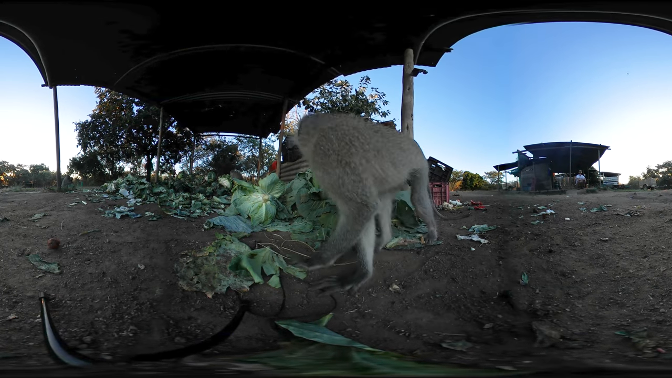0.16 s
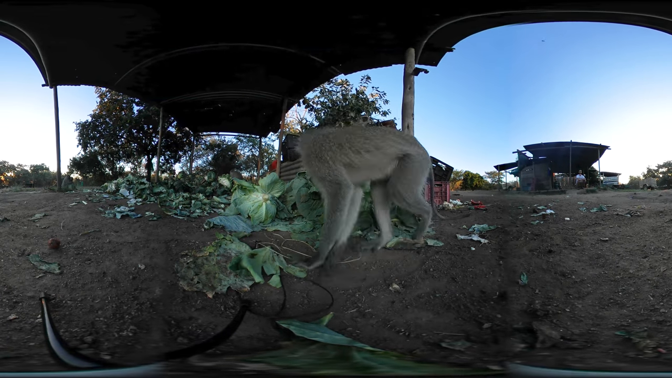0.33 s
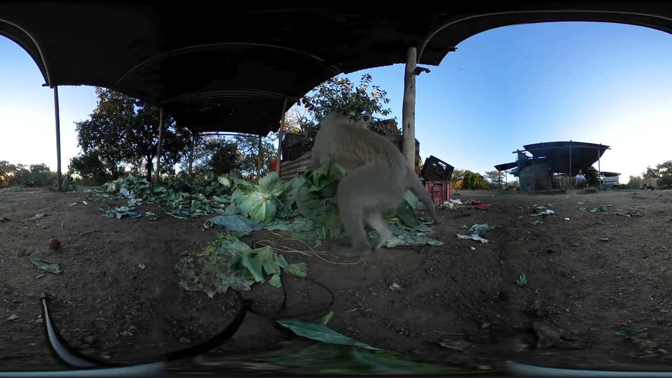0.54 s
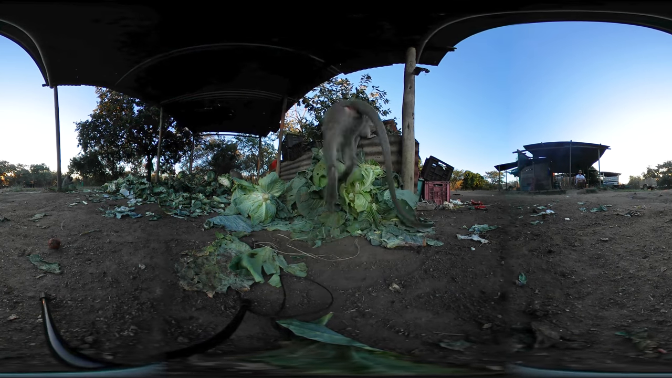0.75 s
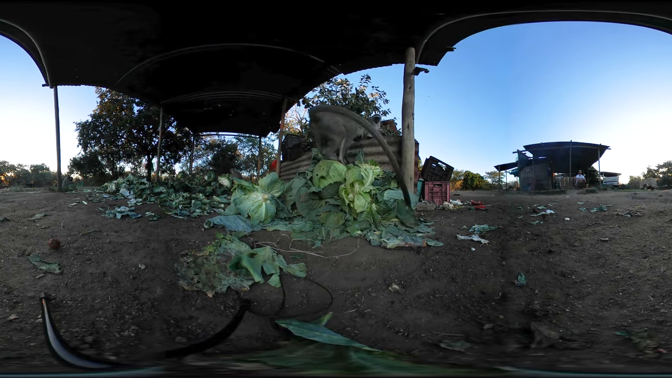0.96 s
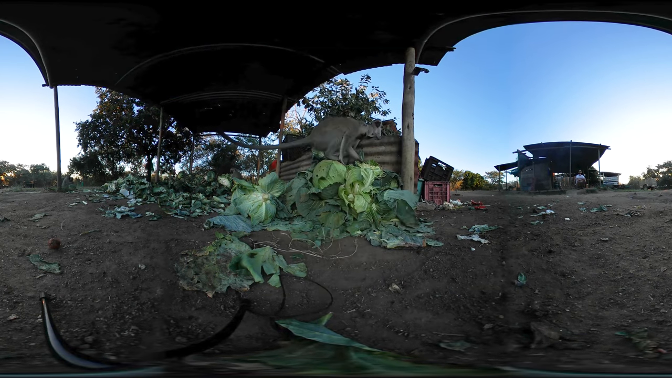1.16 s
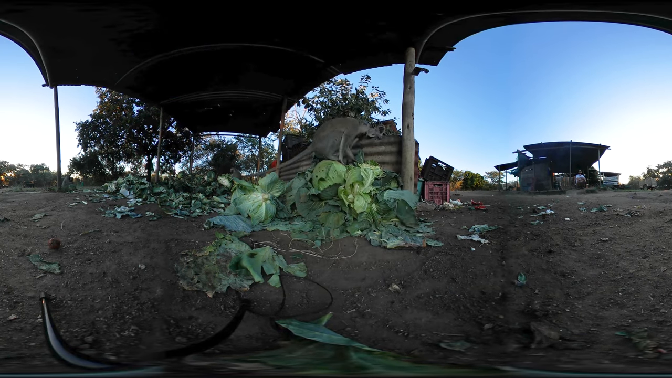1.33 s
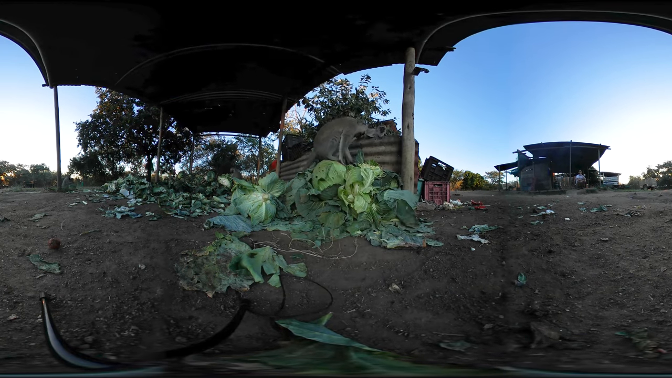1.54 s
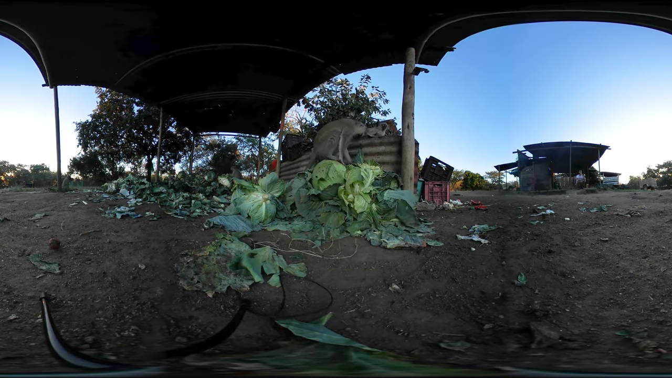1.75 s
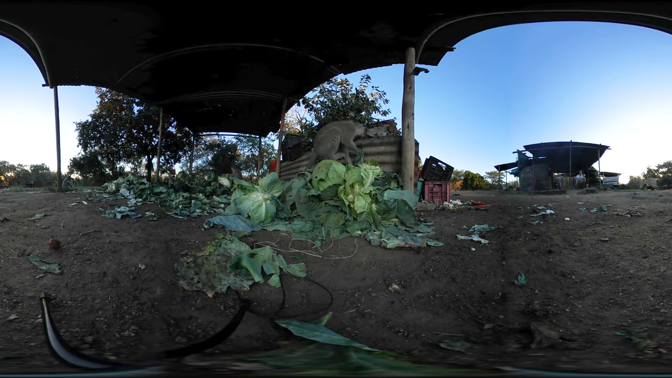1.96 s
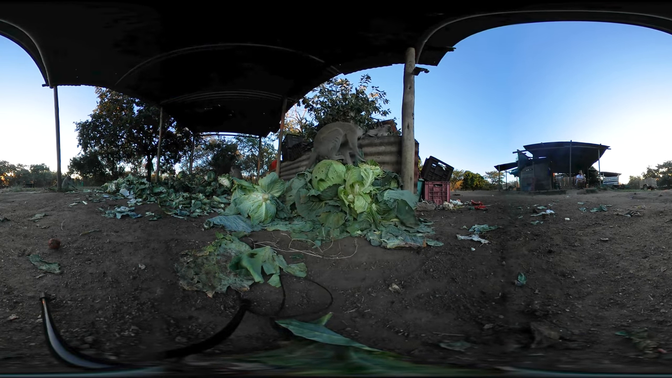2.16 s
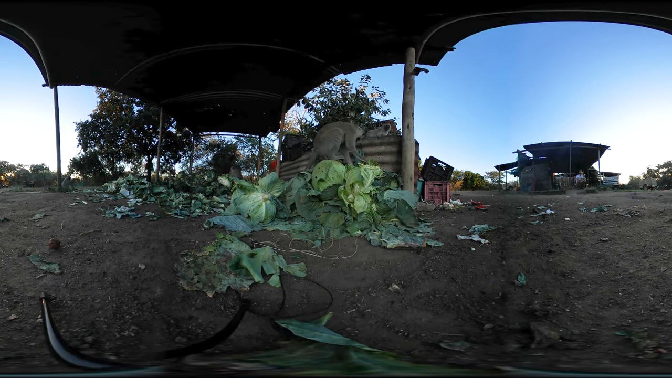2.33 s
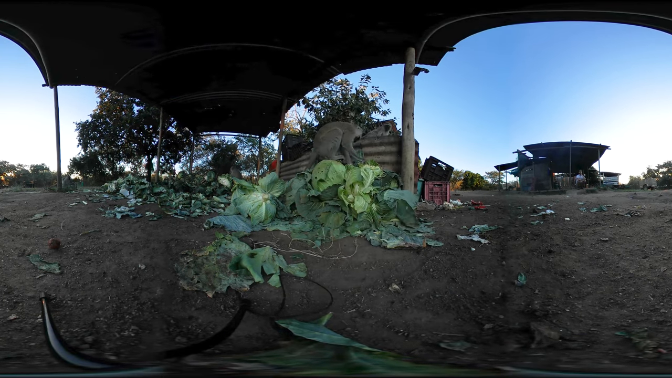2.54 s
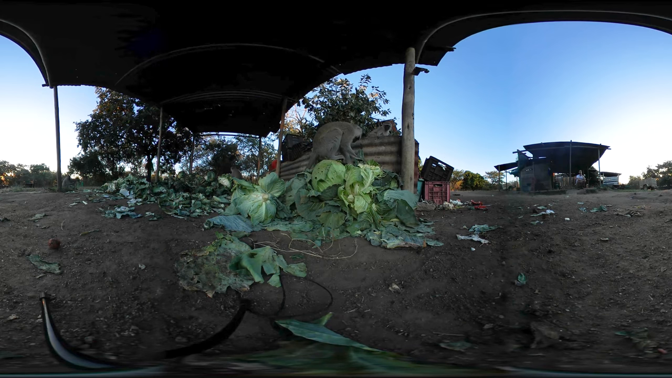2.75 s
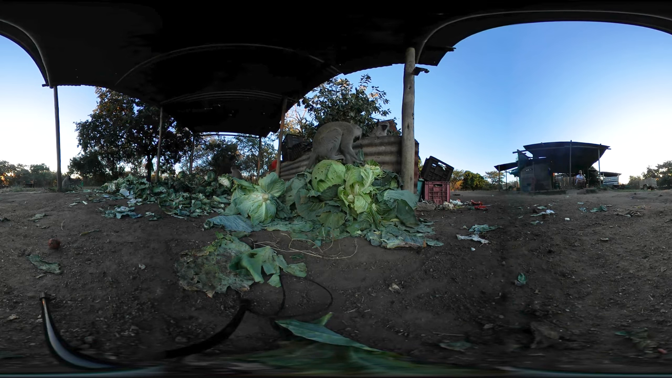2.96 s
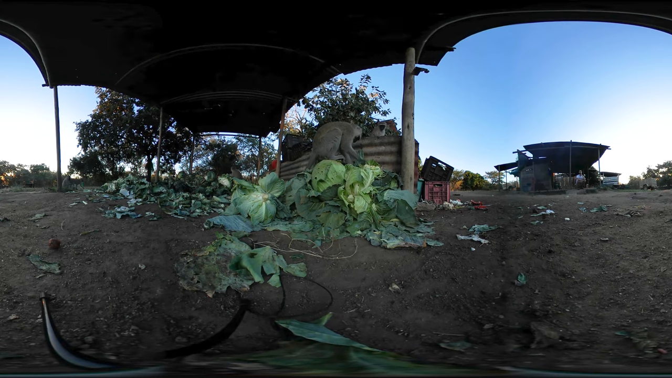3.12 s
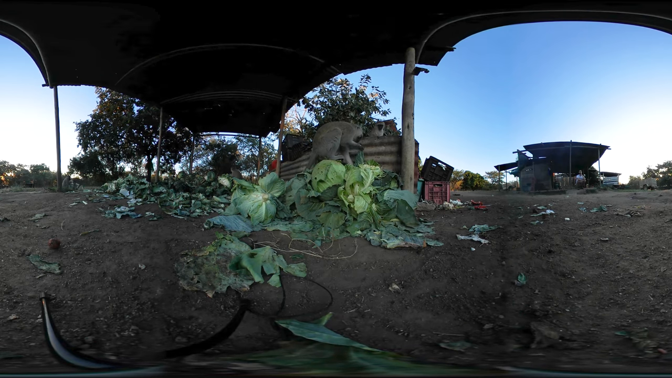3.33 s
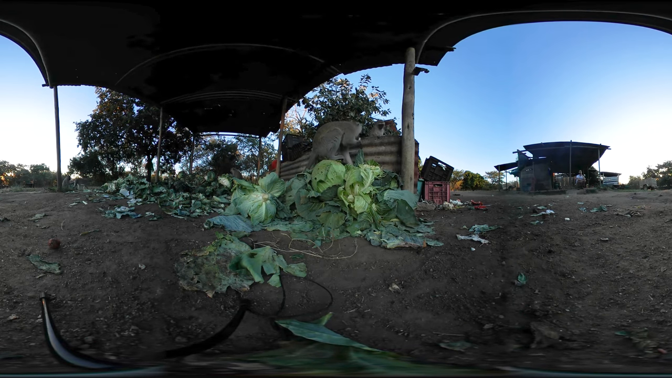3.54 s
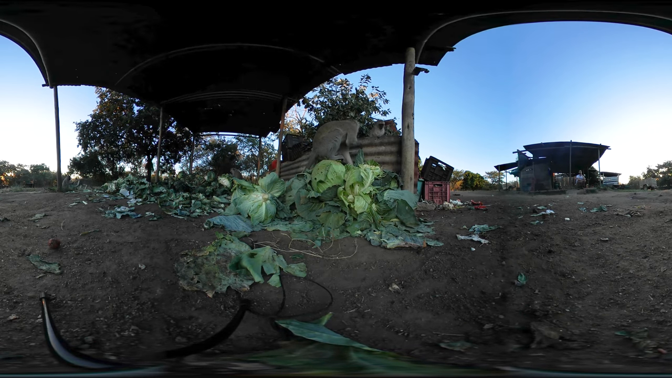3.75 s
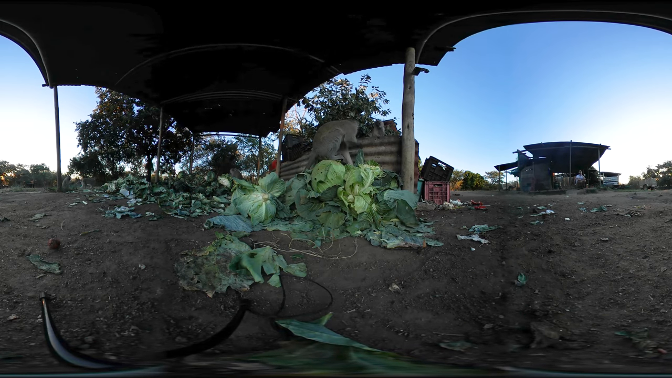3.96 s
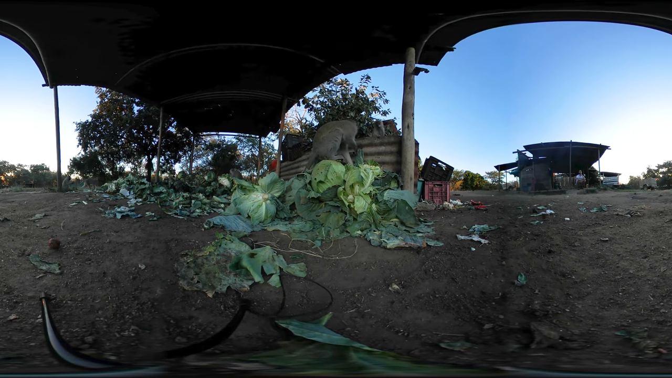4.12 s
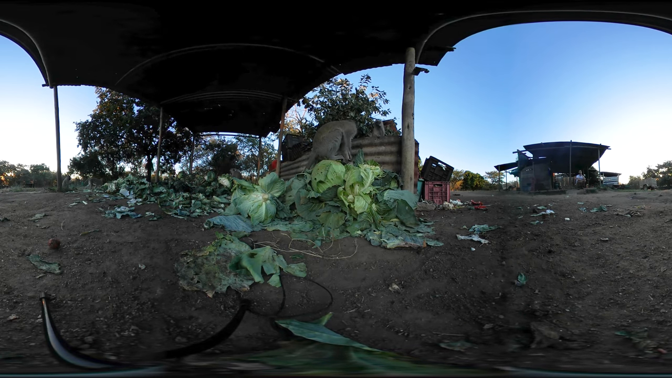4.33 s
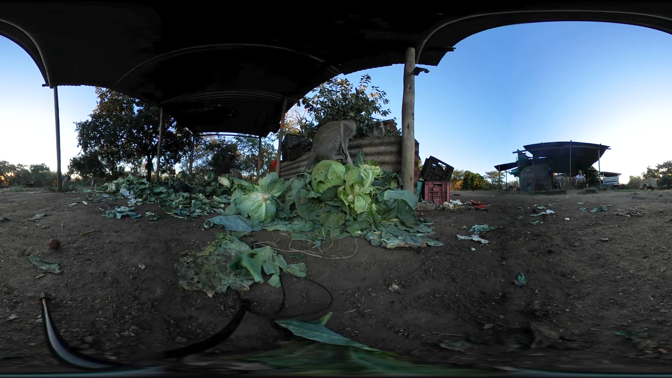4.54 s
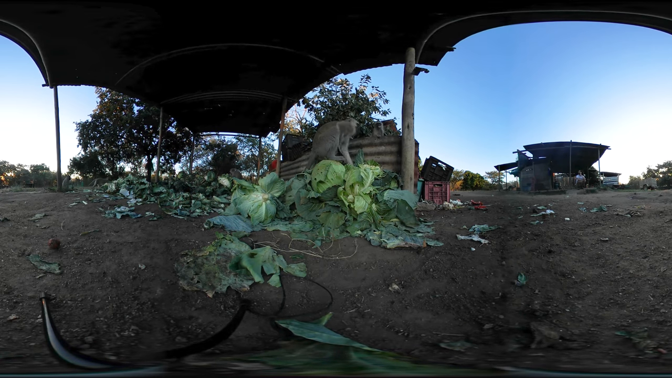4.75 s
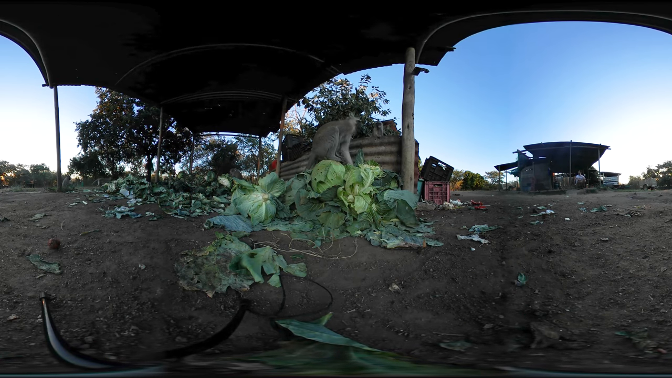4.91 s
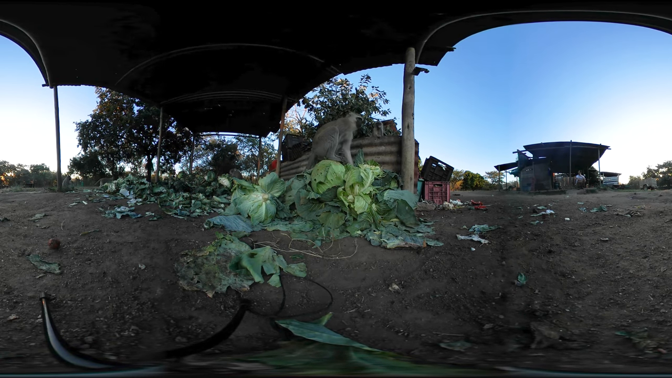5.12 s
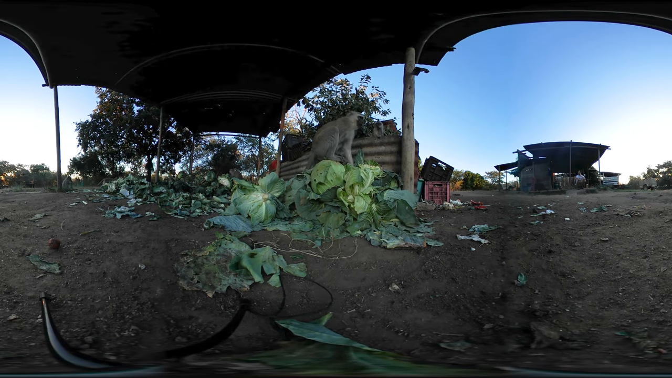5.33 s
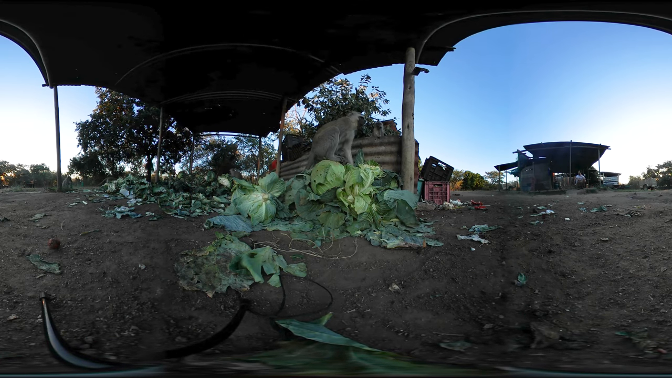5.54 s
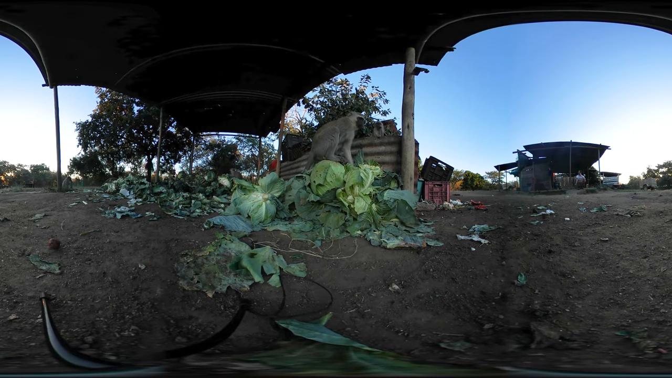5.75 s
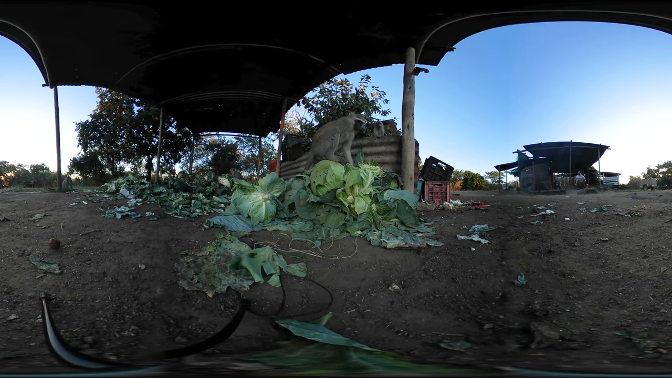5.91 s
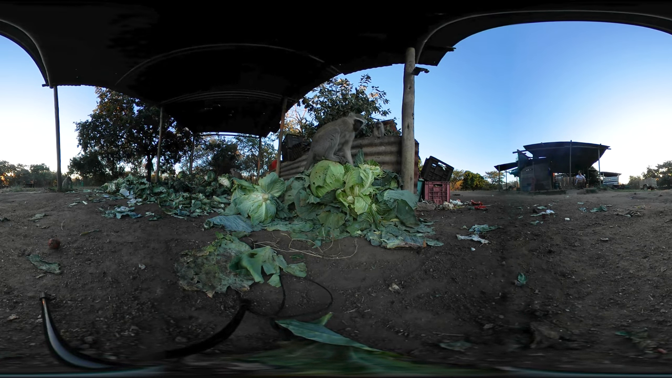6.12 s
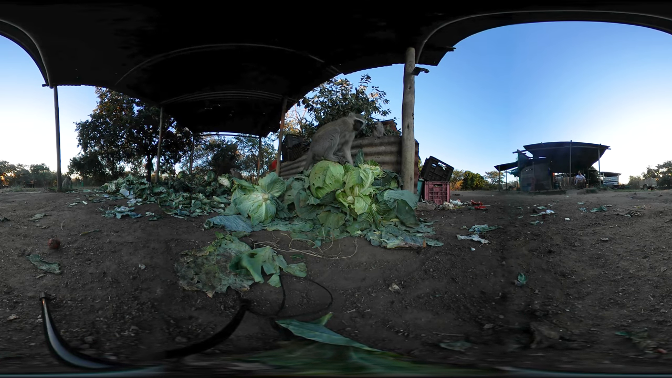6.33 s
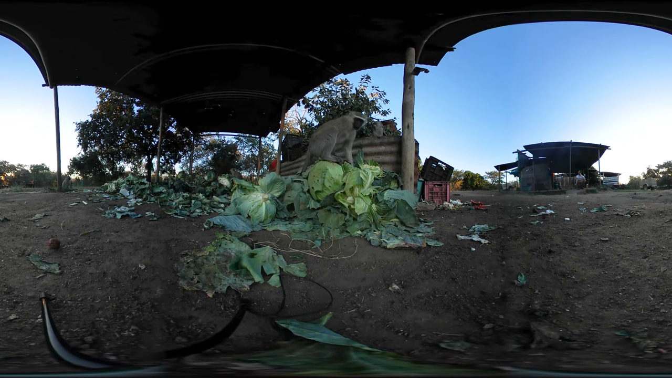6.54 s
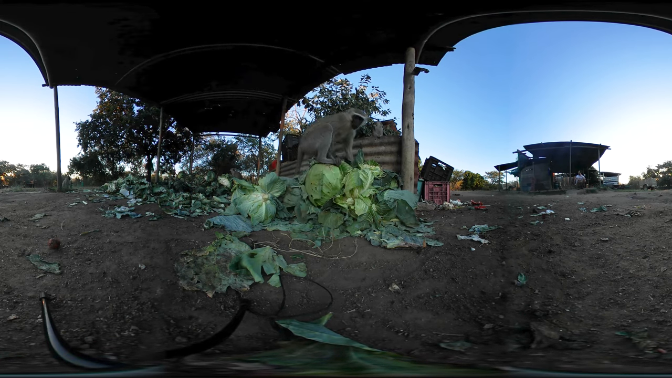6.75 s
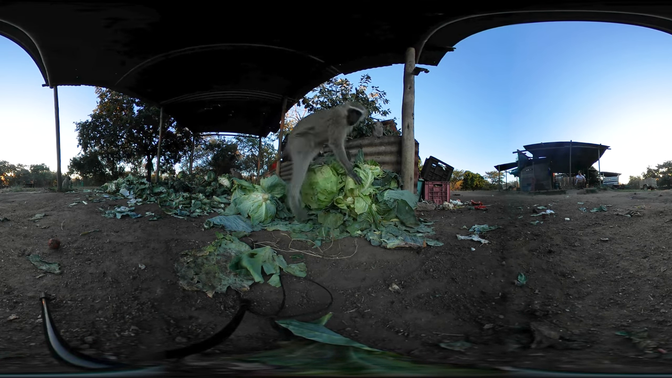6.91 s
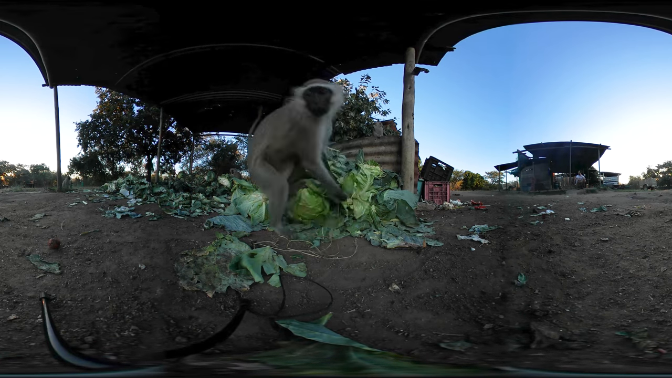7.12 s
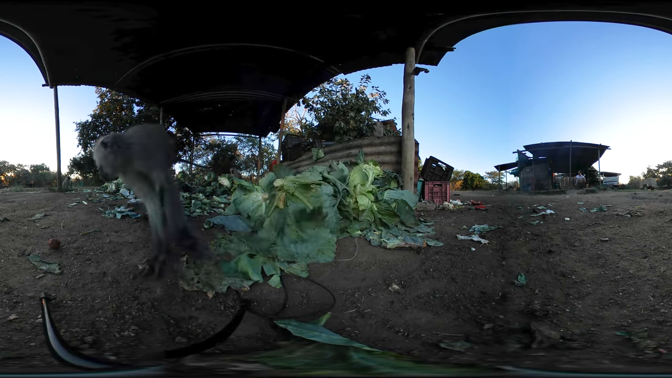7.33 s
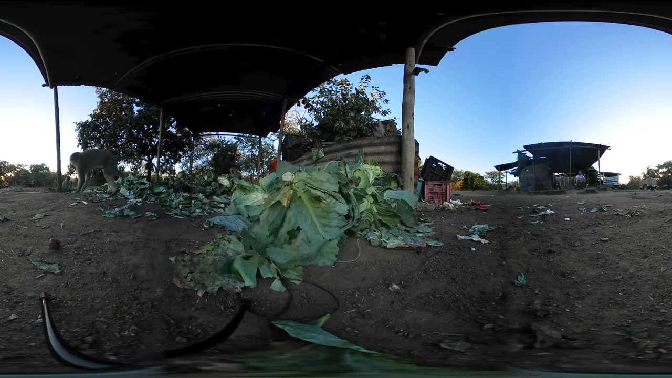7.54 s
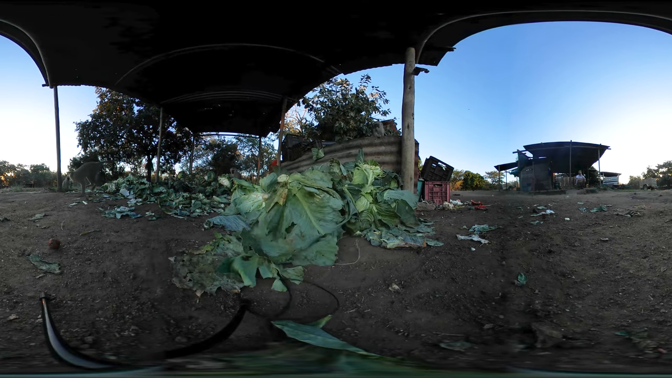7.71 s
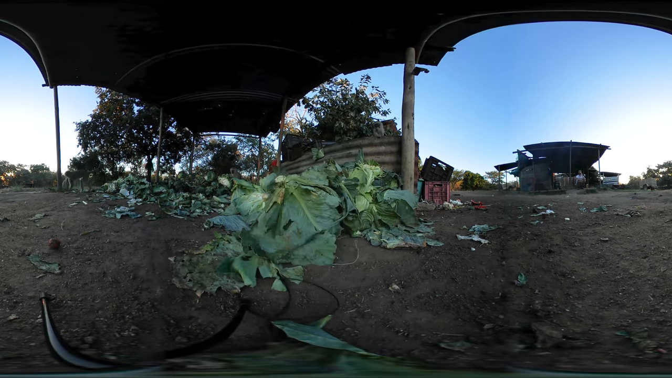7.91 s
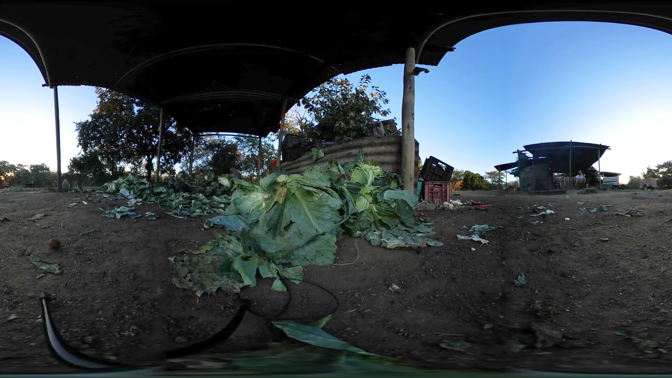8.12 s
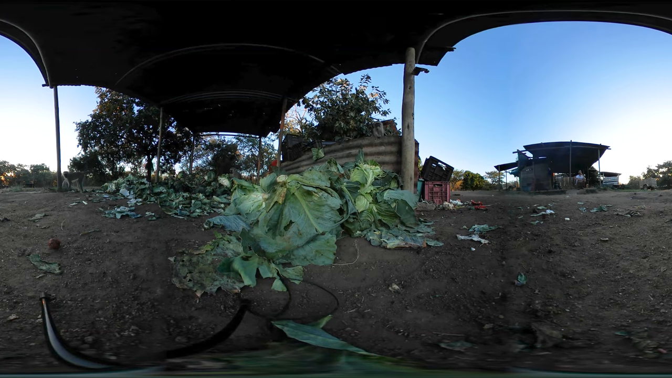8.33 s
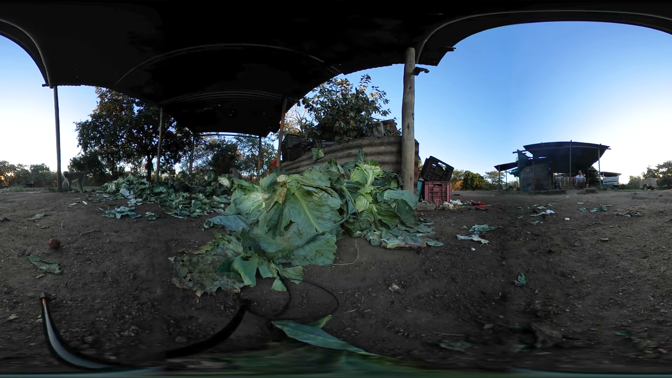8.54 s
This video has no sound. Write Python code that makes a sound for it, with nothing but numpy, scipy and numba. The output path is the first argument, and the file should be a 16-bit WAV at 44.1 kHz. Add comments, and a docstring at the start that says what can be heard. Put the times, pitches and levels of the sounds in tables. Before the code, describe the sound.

Quiet outdoor leaf rustling and small stalk snaps build suddenly to a heavy, wet-crisp crunching rush, then a big leaf slides to rest.

```python
"""Over faint open-air noise a monkey hops onto a heap of cabbage leaves: ribs crunch and a slipping foot squeaks.
It settles and picks at the heap; crisp stalks snap with a short ring, while a thin whirr swells far off.
It bounds off with loud crunches and dull thuds, and a big leaf dragged over lands and slides to rest.
Rustling is a swarm of tiny ringing breaks mixed with rubbing noise, driven by weight, swipes and presses.
Snaps, crunches and thuds are short noise bursts; snaps and crunches also ring."""
import sys
import numpy as np
from scipy import signal
from scipy.fft import rfft, irfft, next_fast_len
from scipy.io import wavfile
from scipy.ndimage import uniform_filter1d
from numba import njit

SR = 44100
rng = np.random.default_rng(int(sys.argv[2]) if len(sys.argv) > 2 else 0)


def transcribe(u):
    """Save the signal u as a 16-bit wav file named by the first command-line argument.

    u: samples, shape (n,) or (channels, n), limited to [-1, 1]; the rate is SR.
    q: integer samples, one column per channel.
    """
    v = np.clip(np.atleast_2d(u).T, -1, 1)
    q = np.round(v * 32767).astype(np.int16)
    wavfile.write(sys.argv[1], SR, q)


N = 377968
TIME = np.arange(N) / SR  # seconds

# Stalks snapped while feeding: (time [s], ring pitch [Hz], ring level [dB], crack level [dB])
STALK_SNAPS = [(2.2203, 2450, -48, -50), (2.24, 2880, -37, -51), (2.481, 1180, -43, -65),
               (2.522, 2000, -43, -59), (3.1303, 1450, -45, -64), (3.413, 2180, -41.5, -45),
               (3.784, 2430, -46, -33), (3.8021, 2480, -27, -24.5), (4.134, 2800, -45.5, -34),
               (4.5873, 2190, -29.5, -26), (4.6038, 4120, -32, -32), (4.6096, 3950, -35, -44),
               (4.6713, 2220, -34.5, -50), (4.9938, 2370, -34, -29), (5.0076, 2130, -38, -34),
               (5.0232, 5850, -37, -33), (5.0928, 2430, -45, -35.5), (5.1536, 2480, -50, -40),
               (5.329, 3940, -48, -39.5), (5.553, 2160, -52, -41.5), (5.618, 1660, -50, -64),
               (5.645, 3820, -44, -58), (5.708, 1810, -43.5, -45), (6.008, 2930, -41.5, -47),
               (6.0933, 2400, -42.5, -35), (6.2425, 6000, -33, -35.5), (6.389, 2370, -46, -35.5),
               (6.485, 5620, -30.5, -42)]
# Ribs crushed underfoot: (time [s], ring pitch [Hz], body level [dB], crack level [dB])
RIB_CRUNCHES = [(0.364, 4500, -39, -30), (0.3886, 1330, -32, -46), (0.3934, 4550, -28, -24),
                (0.4293, 3900, -25.5, -18.5), (0.4609, 1900, -32.5, -53), (1.0721, 5700, -29.5, -24.5),
                (6.8216, 930, -22.5, -24), (6.904, 1960, -22, -31), (6.9175, 1470, -15.5, -30),
                (6.955, 2970, -20.5, -23), (6.997, 2560, -10, -23), (7.03, 4000, -25, -23),
                (7.0443, 1310, -12.5, -24.5), (7.0472, 2630, -13.5, -22), (7.0795, 3080, -18, -17.5),
                (7.1188, 5260, -11.5, -17), (7.2444, 4200, -11, -29), (7.3063, 2860, -28, -7.5),
                (7.3301, 3200, -21, -39), (7.4521, 1620, -15, -40), (7.614, 3420, -36, -25),
                (7.828, 1300, -27, -45)]
# Feet and leaves landing: (time [s], pitch [Hz], level [dB])
LANDINGS = [(0.435, 252, -46), (1.056, 270, -44), (1.352, 340, -39.5), (2.29, 900, -34.5),
            (5.03, 640, -40.5), (6.765, 750, -28), (6.808, 836, -26), (6.937, 720, -22.5),
            (7.087, 945, -20), (7.229, 190, -40.5), (7.365, 140, -37), (7.521, 1000, -23.5),
            (7.656, 794, -23.5)]
# The big leaf sliding to rest: (time [s], resonance [Hz], level [dB])
LEAF_SLIDE = [(7.84, 1400, -48), (7.89, 1380, -31), (7.95, 1350, -32.5), (8.0, 1200, -41.5),
              (8.09, 1080, -48), (8.12, 1214, -40.5), (8.19, 1100, -60.5)]
# A foot slips on a moist leaf with a faint squeak: (time [s], pitch [Hz], level [dB])
FOOT_SQUEAK = [(0.86, 900, -51), (0.92, 1000, -52), (0.97, 950, -53), (1.005, 890, -63)]
# Where the monkey is; the heap hides some treble: (time [s], left minus right [dB], treble [dB])
MONKEY_PLACE = [(.45, -5, -8), (.8, -2, -1), (2.3, -1, -6), (3.8, -3, -6.5), (7.3, -0.5, -4),
                (7.6, -0.5, -5)]
# How hard the monkey's weight works the heap: (time [s], level [dB])
WEIGHT_LOAD = [(0, -57.5), (0.85, -52), (1.35, -51.5), (1.7, -57.5), (2.15, -53), (2.4, -58.5), (2.82, -61),
               (2.98, -57.5), (3.85, -57.5), (4.75, -58), (5.1, -55.5), (6.25, -54.5), (6.67, -39.5),
               (7.05, -26), (7.17, -27.5), (7.38, -24), (7.6, -35.5), (7.74, -40.5), (7.93, -41),
               (8.24, -61)]
# A hand or flank sweeps over leaves: (time of peak [s], build-up [s], crackle level [dB], rub level [dB])
LEAF_SWIPES = [(0.402, 0.032, -35.5, -30.5), (0.68, 0.18, -59.5, -44), (0.801, 0.011, -46.5, -37),
               (0.884, 0.011, -37.5, -47), (0.929, 0.0063, -39, -36), (1.05, 0.032, -43, -38.5),
               (1.838, 0.045, -49, -36.5), (2.258, 0.062, -43, -47.5), (2.572, 0.079, -54.5, -48),
               (4.165, 0.056, -65, -42), (5.05, 0.04, -47, -51), (5.422, 0.022, -47, -44),
               (5.718, 0.017, -44.5, -43), (6.43, 0.018, -45, -37), (7.115, 0.029, -24, -23.5),
               (7.232, 0.03, -22.5, -24), (7.305, 0.0053, -40, -14), (7.939, 0.13, -36, -35.5),
               (8.125, 0.055, -47, -52.5)]
# A foot, or at 7.5 s the big leaf landing, presses leaves down: (time of peak [s], build-up [s], level [dB])
LEAF_PRESSES = [(0.438, 0.014, -40.5), (1.07, 0.031, -50), (2.298, 0.048, -45.5), (6.094, 0.076, -56),
                (6.3, 0.045, -48.5), (6.45, 0.067, -47), (7.223, 0.023, -27.5), (7.309, 0.011, -16),
                (7.501, 0.078, -24.5)]
# Tone colour of flapping leaf blades: (frequency [Hz], relative level [dB])
BLADE_COLOUR = [(30, -11), (90, -21), (200, -17), (600, 1), (1150, 3.5), (1600, 2), (2300, -28)]
# Tone colour of breaking veins: (frequency [Hz], relative level [dB])
VEIN_COLOUR = [(1100, -14), (1700, -2.5), (2500, -1.5), (4000, -3.5), (5300, -6.5), (7000, -11.5)]
# Tone colour of the waxy skin: (frequency [Hz], relative level [dB])
SKIN_COLOUR = [(4000, -15), (5600, -8), (8000, -5.5), (10000, -4.5), (11900, 0), (13000, -7), (15500, -14)]
# Tone colour of the yard: (frequency [Hz], relative level [dB])
YARD_COLOUR = [(25, -11), (110, -9.5), (600, 1), (2000, -3), (5000, -10), (9000, -12), (15500, -19.5)]
# How unlike the two channels are: (frequency [Hz], side minus mid [dB])
STEREO_WIDTH = [(120, -6), (350, -15), (850, -13), (2400, -7), (7000, 0)]

YARD_DB = -54.5
# The far whirr, perhaps an insect: time of peak, build-up, pitch, narrowness and level
WHIRR_S, WHIRR_BUILD_S, WHIRR_HZ, WHIRR_Q, WHIRR_DB = 3.97, 0.45, 2520, 7, -59.5
SLIDE_WIDTH_HZ, SQUEAK_WIDTH_HZ = 237, 94  # reach to each side of the moving pitch
# Blades and skins follow the load: level against the veins at REST_DB, and dB gained per dB of load
REST_DB = -58
BLADE_DB, BLADE_GROWTH = -3, 0.9
SKIN_DB, SKIN_GROWTH = 5.5, 0.9
PRESS_VEIN_DB, PRESS_SKIN_DB = 2.5, -8  # against the flexing blades
RELEASE_SHARE, STROKE_SHAPE = 0.59, 2  # leaves relax faster than they bend; the exponent rounds the top
# Leaves crackle most at this level; the slopes are dB of crackle lost per dB below and above it
CRACKLE_DB, GENTLE_SLOPE, MERGE_SLOPE = -52, 0.32, 0.17
SHARP_SHARE, PIP_SHARE = 0.32, 0.68  # sharp breaks and pips in the veins, against their rub
TOP_HZ = 15600


def undb(db):
    """Turn decibels into a gain."""
    return 10 ** (np.asarray(db) / 20)


def unit(x):
    """Scale a signal to an average strength (rms) of 1."""
    return x / np.sqrt(np.mean(x ** 2))


def curves(table):
    """Join the points of each table column by straight lines in time."""
    s, *columns = np.transpose(table)
    return [np.interp(TIME, s, column) for column in columns]


def response(points, n):
    """Gain of a tone colour at each frequency of n samples; it falls away beyond both ends."""
    hz, db = np.transpose(points)
    f = np.arange(n // 2 + 1) * SR / n + 1  # the 1 avoids log(0)
    gain = undb(np.interp(np.log(f), np.log(hz), db))
    low_fall = np.minimum(f / hz[0], 1) ** 2
    high_fall = np.minimum(hz[-1] / f, 1) ** 3
    return gain * low_fall * high_fall


def colour(x, points):
    """Filter a sound to a tone colour, at rms 1."""
    n = next_fast_len(x.shape[-1])
    filtered = irfft(rfft(x, n) * response(points, n), n)
    return unit(filtered[..., :x.shape[-1]])


def walk(rate):
    """Glide between random levels, rate of them a second, at rms 1."""
    hold = max(int(SR / rate), 2)
    levels = np.repeat(rng.standard_normal(N // hold + 1), hold)
    return unit(uniform_filter1d(levels, hold)[:N])


def add(track, s, sound):
    """Mix a sound into a track at time s."""
    i = max(int(s * SR), 0)
    track[:, i:i + sound.shape[1]] += sound[:, :N - i]


def stroke(s, build_s):
    """Swell from 0 to 1 up to time s, then let go faster."""
    away = np.maximum(s - TIME, (TIME - s) / RELEASE_SHARE) / build_s
    out = np.zeros(N)
    near = away < 6
    out[near] = np.exp(-away[near] ** STROKE_SHAPE)
    return out


def noise(count):
    """White noise in two channels, used as mid and side."""
    return rng.standard_normal((2, count))


def ports(x, pan_db):
    """Mid and side to left and right; the side share is least from 350 to 850 Hz, most in the treble."""
    n = next_fast_len(x.shape[1])
    hz, db = np.transpose(STEREO_WIDTH)
    f = np.arange(n // 2 + 1) * SR / n + 1
    side_gain = undb(np.interp(np.log(f), np.log(hz), db))
    gains = np.array([np.ones_like(side_gain), side_gain]) / np.hypot(1, side_gain)
    mid, side = irfft(rfft(x, n) * gains, n)[:, :x.shape[1]]
    g = undb(pan_db)
    # the last factor keeps the summed power steady while the sound moves
    return np.array([(mid + side) * g, mid - side]) * np.sqrt(2 / (1 + g * g))


def yard():
    """Faint, nearly steady open-air noise; it comes from all around, so its side share is larger."""
    spread = undb([[0], [3.5]])
    air = unit(colour(noise(N), YARD_COLOUR) * spread)
    return air * undb(YARD_DB + .5 * walk(5.9))


def whirr():
    """A thin band of noise swells and fades in the distance."""
    band = signal.lfilter(*signal.iirpeak(WHIRR_HZ, WHIRR_Q, fs=SR), noise(N))
    return unit(band) * undb(WHIRR_DB) * stroke(WHIRR_S, WHIRR_BUILD_S)


def shelter(x, wet_db, decay_s):
    """The roof and the wall behind the heap send back a thin, short scatter of echoes."""
    t = np.arange(SR // 4) / SR
    echoes = noise(len(t)) * np.exp(-t / decay_s) * (t > .009)  # nothing returns before 9 ms
    echoes = signal.sosfilt(signal.butter(1, 5000, fs=SR, output="sos"), echoes)
    echoes = echoes / np.sqrt(np.sum(echoes ** 2) / 2)
    return undb(wet_db) * signal.fftconvolve(x, echoes, axes=1)[:, :N]


def slide(path, width_hz):
    """Scraping over a leaf: a band of noise whose resonance moves as the blade bends."""
    hz, db = curves(path)
    low_pass = signal.butter(2, width_hz, fs=SR, output="sos")
    scrape = signal.sosfilt(low_pass, rng.standard_normal((4, N)))
    turn = 2 * np.pi * np.cumsum(hz) / SR
    # multiplying by a sine and a cosine lifts the low noise to the moving pitch
    band = scrape[:2] * np.cos(turn) + scrape[2:] * np.sin(turn)
    moving = (TIME > path[0][0]) & (TIME < path[-1][0])
    return unit(band) * undb(db) * moving


def burst(t, tear_s, decay_s, tail_s):
    """Loudness of a break: a quick rise, a short full hold, a fast decay, a faint spread before and after."""
    rise = np.minimum(t - .0004, 0) / 0.0005
    dying = np.maximum(t - tear_s, 0) / decay_s
    tear = np.exp(rise - dying)
    spread = undb(-17) * np.exp(-np.maximum(t / tail_s, -t / .003))
    return np.hypot(tear, spread)


def blow(x, db):
    """Set a short sound's level, its energy counted as rms over 4.5 ms."""
    return x * undb(db) * np.sqrt(2 * .0045 * SR / np.sum(x ** 2))


def ring(t, hz, decay_s):
    """The main ring of a broken stalk or rib: a sine that starts at 0 s and dies away."""
    phase = rng.uniform(0, 2 * np.pi, (2, 1))
    onset = np.clip(t / 0.001, 0, 1)
    return np.sin(2 * np.pi * hz * t + phase) * onset * np.exp(-np.abs(t) / decay_s)


def crack(t, envelope):
    """The bright edge of a break; every piece of leaf favours other pitches."""
    hz = np.geomspace(SKIN_COLOUR[0][0], SKIN_COLOUR[-1][0], num=16)
    db = np.interp(hz, *np.transpose(SKIN_COLOUR)) + 4.5 * rng.standard_normal(len(hz))
    return colour(noise(len(t)) * envelope, np.transpose([hz, db]))


def thuds(t):
    """The springy heap takes a weight with a dull knock; the deeper ones last longer."""
    out = np.zeros((2, N))
    for s, hz, db in LANDINGS:
        push = noise(len(t)) * burst(t, 0.002, 2 / hz, 10 / hz)
        knock = colour(push, [(hz / 2, -6), (hz, 0), (hz * 4, -20)])
        add(out, s + t[0], blow(knock, db))
    return out


def crunches(t):
    """A thick rib gives way: a longer tear with a broad, heavily damped body."""
    out = np.zeros((2, N))
    envelope = burst(t, 0.0013, 0.0011, 0.006)
    for s, hz, body_db, crack_db in RIB_CRUNCHES:
        flesh_colour = [(200, -17), (hz / 2, -7), (hz, 0), (hz * 2, -7), (13000, -26)]
        flesh = colour(noise(len(t)) * envelope, flesh_colour)
        body = flesh + 0.73 * unit(ring(t, hz, 0.00073))
        add(out, s + t[0], blow(body, body_db) + blow(crack(t, envelope), crack_db))
    return out


def snaps(t):
    """A stalk parts in about a millisecond and rings for a few cycles."""
    out = np.zeros((2, N))
    envelope = burst(t, 0.00088, 0.00087, 0.012)
    for s, hz, ring_db, crack_db in STALK_SNAPS:
        # the fibres that part after it ring at the same pitch
        fibres = signal.lfilter(*signal.iirpeak(hz, 3.5, fs=SR), noise(len(t)) * envelope)
        body = unit(ring(t, hz, 0.0015)) + 0.76 * unit(fibres)
        add(out, s + t[0], blow(body, ring_db) + blow(crack(t, envelope), crack_db))
    return out


def effort():
    """Levels in dB of blades, veins and skins: load, swipes and presses add their power."""
    load_db, = curves(WEIGHT_LOAD)
    _, treble_db = curves(MONKEY_PLACE)
    above = load_db - REST_DB
    blade = undb(REST_DB + BLADE_DB + BLADE_GROWTH * above) ** 2
    vein = undb(load_db) ** 2
    skin = undb(REST_DB + SKIN_DB + SKIN_GROWTH * above + treble_db) ** 2
    for s, build_s, crackle_db, rub_db in LEAF_SWIPES:
        power = stroke(s, build_s) ** 2
        vein = vein + power * undb(crackle_db) ** 2
        skin = skin + power * undb(rub_db) ** 2
    presses = sum((stroke(s, build_s) * undb(db)) ** 2 for s, build_s, db in LEAF_PRESSES)
    vein = vein + presses * undb(PRESS_VEIN_DB) ** 2
    skin = skin + presses * undb(PRESS_SKIN_DB) ** 2
    return 10 * np.log10([blade + presses, vein, skin])


@njit
def grains(start, hz, cycles, size, phase):
    """Damped rings that fall by 1/e in so many cycles, each with its own mid and side phase."""
    out = np.zeros((2, N))
    for k in range(len(start)):
        # each step turns the wave a little and shrinks it
        pole = np.exp((2j * np.pi - 1 / cycles[k]) * hz[k] / SR)
        mid = size[k] * np.exp(1j * phase[k, 0])
        side = size[k] * np.exp(1j * phase[k, 1])
        for i in range(start[k], min(N, start[k] + int(5 * cycles[k] * SR / hz[k]))):
            out[0, i] += mid.imag
            out[1, i] += side.imag
            mid, side = mid * pole, side * pole
    return out


def fractures(rate, lo_hz, hi_hz, cycles, spread_db, count=3):
    """A swarm of tiny breaks, rate a second, most faint and a few strong; each rings count leaf patches."""
    breaks = int(rate * N / SR)
    start = np.repeat((rng.random(breaks) * N).astype(np.int64), count)
    strength = np.minimum(-np.log(1 - rng.random(breaks)), 2.8)
    size = np.repeat(undb(spread_db * strength), count)
    v = rng.random((len(start), 4))
    hz = lo_hz * (hi_hz / lo_hz) ** v[:, 0]
    # the square root of pitch makes up for high rings being shorter
    return unit(grains(start, hz, cycles * (.5 + v[:, 1]), size * np.sqrt(hz), 2 * np.pi * v[:, 2:]))


def patchy(patchy_db, size=512):
    """Friction noise whose resonances come and go as different patches of leaf touch."""
    spectra = signal.stft(noise(N), nperseg=size)[2]
    patches = rng.standard_normal(spectra.shape[1:])
    patches = uniform_filter1d(patches, size=4, axis=0)  # smooth over pitch
    patches = uniform_filter1d(patches, size=3, axis=1)  # smooth over time
    return unit(signal.istft(spectra * undb(patchy_db * unit(patches)))[1][:, :N])


def crowd(breaks, points, db):
    """A light touch mostly rubs, a firm one crackles, and under a heavy one breaks merge into a rush."""
    too_gentle_db = (CRACKLE_DB - db) * GENTLE_SLOPE
    merging_db = (db - CRACKLE_DB) * MERGE_SLOPE
    lost_db = np.maximum(too_gentle_db, merging_db)
    texture = colour(breaks / undb(lost_db) + patchy(3.4), points)
    return texture * undb(db + walk(75) + 0.63 * walk(18))  # the level flutters


def rustle():
    """Blades flap; small veins give way with a pip; sharper breaks also tick in the waxy skin."""
    blade_db, vein_db, skin_db = effort()
    flaps = fractures(300, 124.6, 2205, 2.94, 2.5)
    pips = fractures(240, 1384, 5120, 4.8, 4.2, count=2)
    breaks = fractures(340, 1324, 15900, 4.1, 3.9, count=6)
    blades = crowd(0.68 * flaps, BLADE_COLOUR, blade_db)
    veins = crowd(SHARP_SHARE * breaks + PIP_SHARE * pips, VEIN_COLOUR, vein_db)
    skins = crowd(breaks, SKIN_COLOUR, skin_db)
    return blades + veins + skins


def scene():
    """Leaf sounds from where the monkey is, under the shelter, over the yard."""
    t = np.arange(-128, 3968) / SR  # clock of one short sound; the break is at 0 s
    pan_db, _ = curves(MONKEY_PLACE)
    slides = slide(LEAF_SLIDE, SLIDE_WIDTH_HZ) + slide(FOOT_SQUEAK, SQUEAK_WIDTH_HZ)
    leaves = rustle() + snaps(t) + crunches(t) + thuds(t) + slides
    background = yard() + whirr()
    return ports(leaves + shelter(leaves, -16.5, 0.012), pan_db) + ports(background, 0)


def record(dry):
    """Flatten peaks beyond full scale, then cut the treble steeply above TOP_HZ."""
    low_pass = signal.ellip(10, .1, 70, TOP_HZ, fs=SR, output="sos")
    return signal.sosfilt(low_pass, np.clip(dry, -1, 1))


dry = scene()
out = record(dry)
transcribe(out)
```